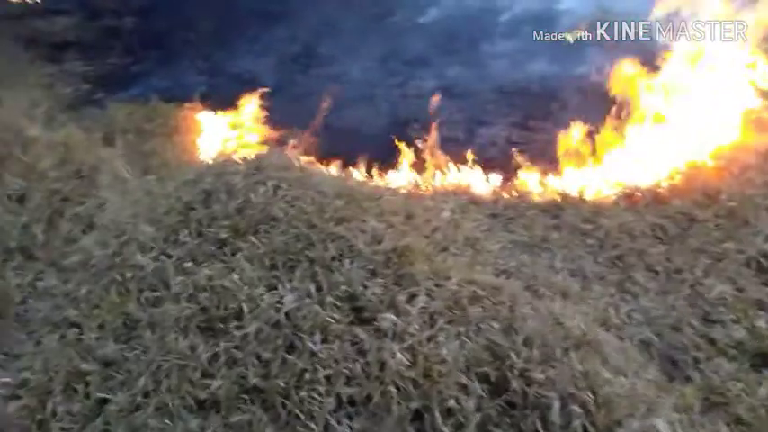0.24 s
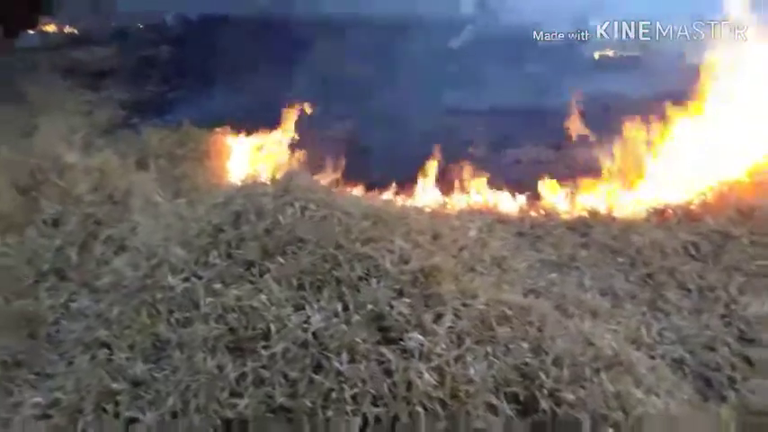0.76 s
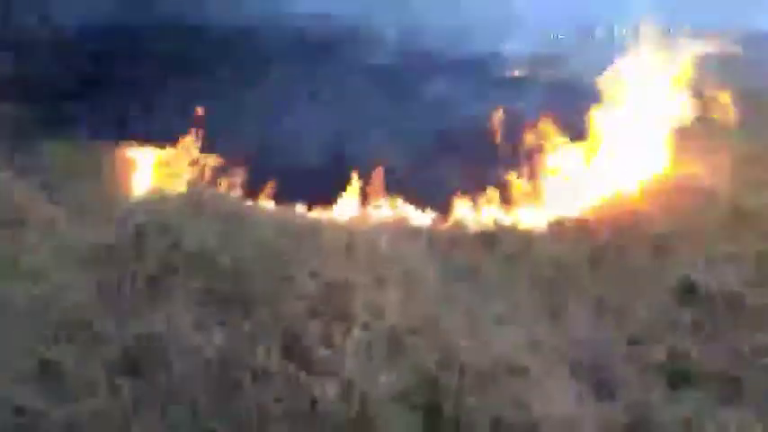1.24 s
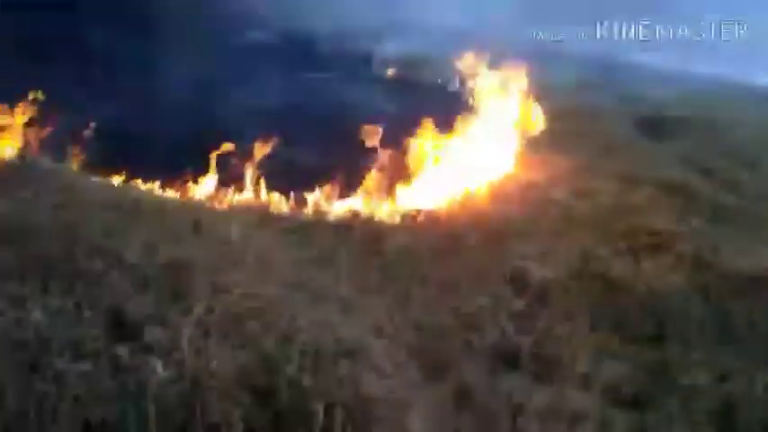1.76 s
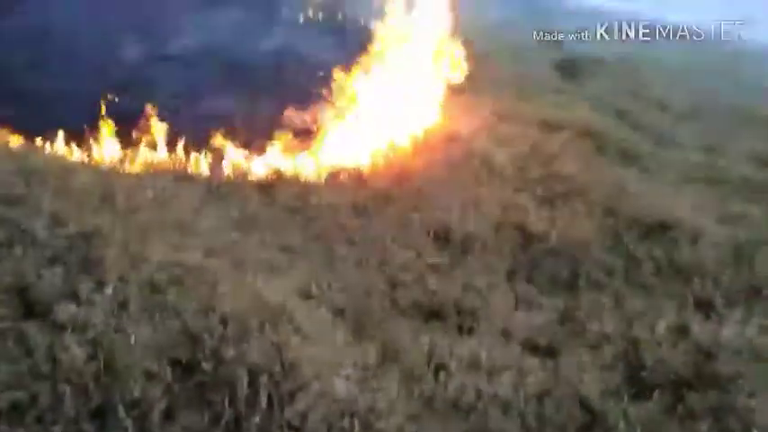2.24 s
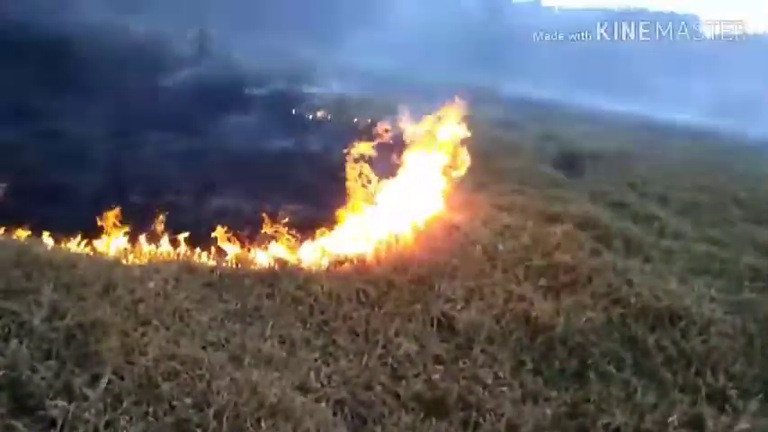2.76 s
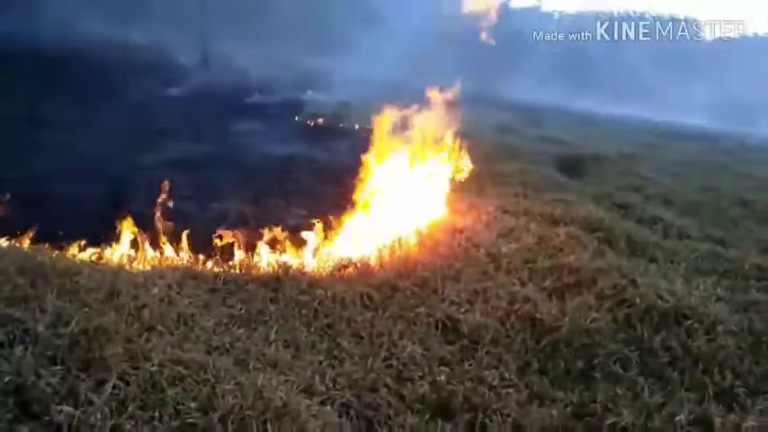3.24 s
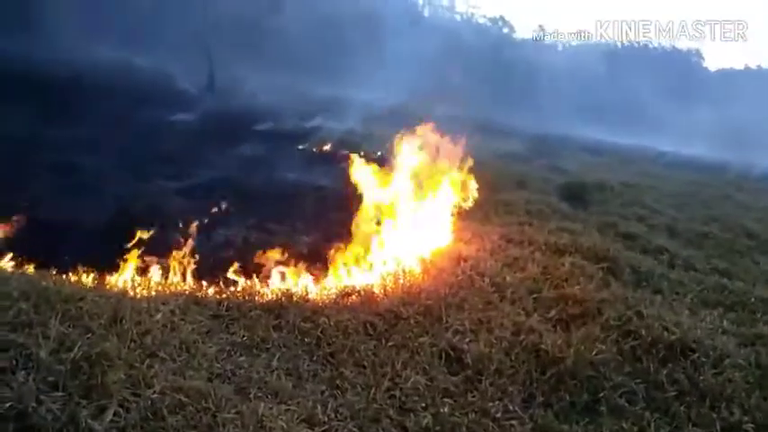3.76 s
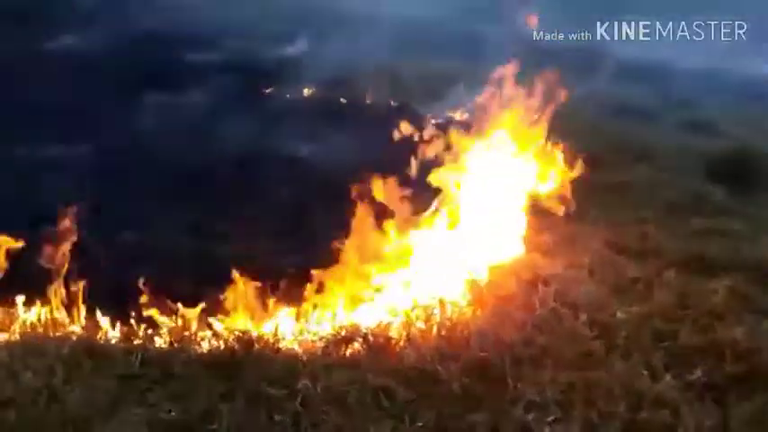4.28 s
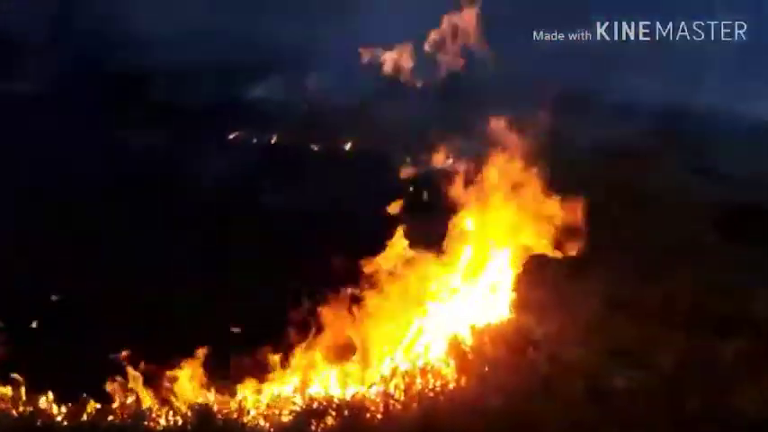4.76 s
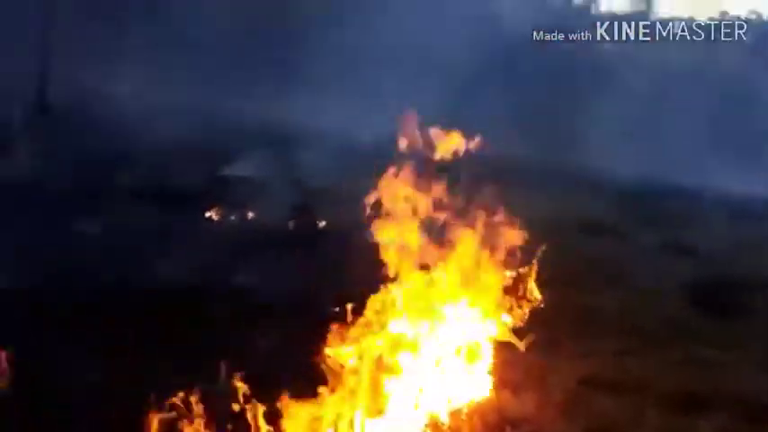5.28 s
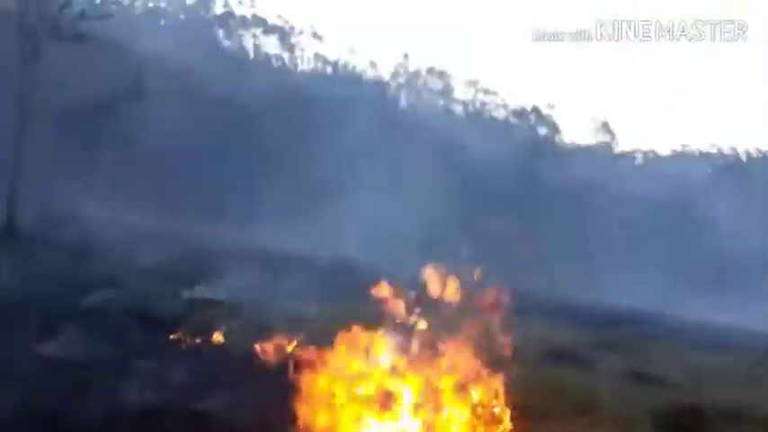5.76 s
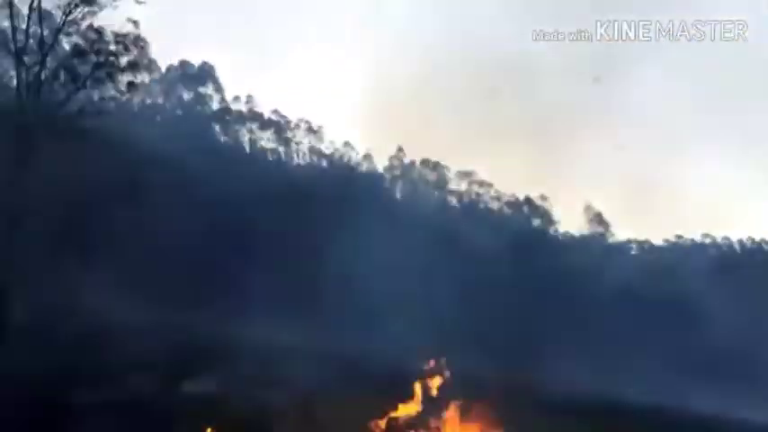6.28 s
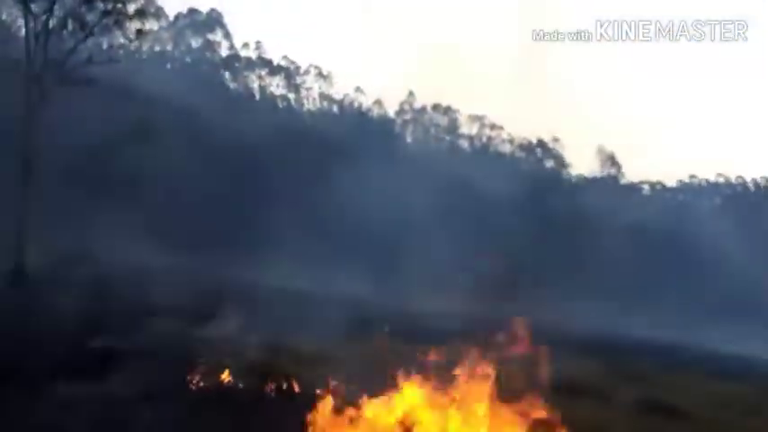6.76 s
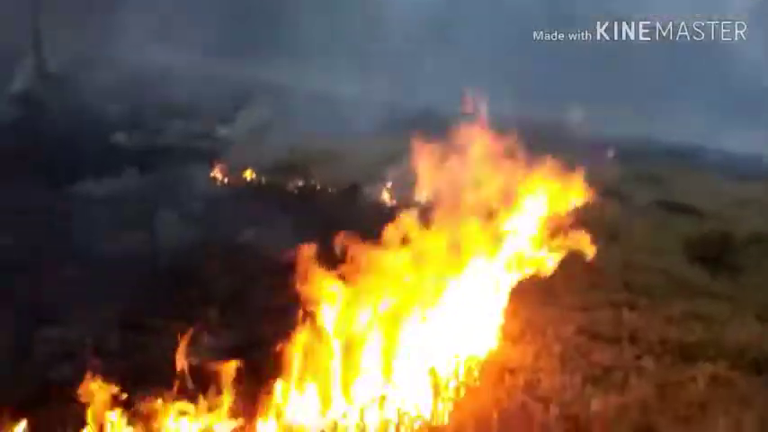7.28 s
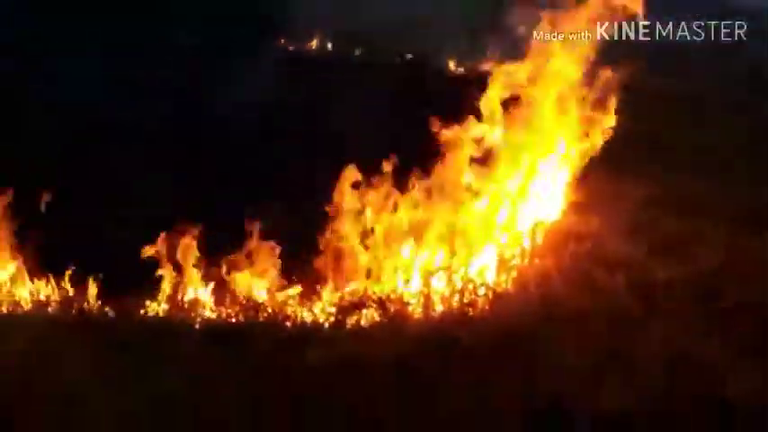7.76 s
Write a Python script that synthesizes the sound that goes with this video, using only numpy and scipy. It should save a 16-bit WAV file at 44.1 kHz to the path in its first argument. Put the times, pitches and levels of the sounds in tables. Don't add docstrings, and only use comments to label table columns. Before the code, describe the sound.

Outdoors on a grassy slope, a front of dry grass burns a few steps from a hand-held phone, wide in stereo, with the left side a little duller. Nearly silent until 0.17 s, then a bright fizzing hiss and flame roar fade in fast, with snaps at once. Dense fine crackle continues throughout. From 1.3 to 2 s the fire surges: heavy cracks, woody knocks, and strong low thumps of air near 1.5 and 1.97 s. It settles from 2 to 2.7 s, though puffs of roar and a hard pop at 2.7 s break through. Fizz strengthens from 3 to 4 s, with short flares and snaps around 3.6 and 4.3 s. The roar turns hollower near 4.8 s; another burst comes at 5.4 s. Around 6 to 7 s it thins to lighter spitting with brief flares. From 7.2 s snaps and fizz build, with buffeting air near 7.7 s, still burning at 8 s.

```python
import sys
import numpy as np
from scipy import signal
from scipy.fft import rfft, irfft, next_fast_len
from scipy.io import wavfile
from scipy.ndimage import uniform_filter1d, map_coordinates

SR = 44100
rng = np.random.default_rng(int(sys.argv[2]) if len(sys.argv) > 2 else 0)


def int16_out(signal):
    q = np.round(np.clip(np.atleast_2d(signal).T, -1, 1) * 32767)
    wavfile.write(sys.argv[1], SR, q.astype(np.int16))


def gain_from_decibels(decibels):
    exponent = np.asarray(decibels, float) / 20
    return 10 ** exponent


N = 353682


def unit(x):
    return x / np.sqrt(np.mean(x ** 2) + 1e-20)


def along(points, hz):
    f, v = np.transpose(points)
    return np.interp(np.log(hz + 1), np.log(f + 1), v)


def wobble(rate):
    knots = rng.standard_normal(int(N * rate / SR) + 4)
    return map_coordinates(knots, [np.arange(N) * rate / SR])


def curves(rows):
    s, *cols = np.transpose(rows)
    return [np.interp(np.arange(N) / SR, s, c) for c in cols]


def swells(rows):
    out = np.zeros(N)
    for s, rise_db, length in rows:
        length = max(length, .02)
        start, end = s - 0.55 * length, s + length
        a, b = int(max(start, 0) * SR), int(end * SR)
        t = np.arange(N)[a:b] / SR
        out[a:b] += np.interp(t, [start, s, end], [0, rise_db, 0])
    return out


def filtered(x, response):
    m = next_fast_len(N + 8192)
    return irfft(rfft(x, m) * response(np.fft.rfftfreq(m, 1 / SR)), m)[..., :N]


def resonance(centre_hz, width_hz):
    return lambda f: 1j * f * width_hz / (centre_hz ** 2 - f * f + 1j * f * width_hz)


def rush(spectrum, patchy_db):
    z = signal.stft(rng.standard_normal((2, N)), nperseg=512)[2]
    field = uniform_filter1d(rng.standard_normal(z.shape[1:]), size=8, axis=0)
    field = uniform_filter1d(field, size=5, axis=1)
    pair = signal.istft(z * gain_from_decibels(patchy_db * unit(field)), nperseg=512)[1][:, :N]
    return unit(filtered(pair, lambda hz: gain_from_decibels(along(spectrum, hz))))


# (f/Hz, width/Hz)
STEM_MODES = [
    (1150, 3540),
    (4000, 6680),
    (9500, 11300),
]


def bursts(s, stems_db, life_ms, spiky_db, ring_db):
    t = np.arange(512) / SR
    life = np.clip(life_ms, .3, 9)[:, None] / 1000
    shape = (1 - np.exp(-t / 0.00037)) * (np.exp(-t / life) + 3.2 * np.exp(-t / 0.00011))
    draw = rng.standard_normal((len(s), 3, len(t)))
    volley = shape * gain_from_decibels(spiky_db * draw[:, 2]) * draw[:, :2].transpose(1, 0, 2)
    volley /= np.sqrt(np.sum(volley ** 2, axis=(0, 2)) / (life[:, 0] * SR))[:, None]
    where = (np.round(s * SR).astype(int)[:, None] + np.arange(len(t))).ravel()

    def lay(db):
        gain = gain_from_decibels(db)[:, None]
        return np.array([np.bincount(where, (gain * v).ravel(), N + len(t))[:N] for v in volley])

    layers = [lay(db) for db in np.transpose(stems_db)]
    out = sum(filtered(x, lambda f: resonance(*mode)(f) ** 2) for x, mode in zip(layers, STEM_MODES))
    return out + gain_from_decibels(ring_db) * filtered(layers[0], resonance(4000, 200))


def air_push(rows, alike_db, opposed_db, cycles=0.35):
    out, t = np.zeros(N + SR), np.arange(SR // 10) / SR
    for s, db, hz in rows:
        swing = np.sin(2 * np.pi * hz * t / (1 + 0.02 * hz * t))
        push = t * hz * np.exp(-t * hz / cycles) * swing
        out[round(s * SR):][:len(t)] += gain_from_decibels(db) * push
    return out[:N] * (gain_from_decibels(alike_db) + gain_from_decibels(opposed_db) * np.array([[1], [-1]]))


# (f/Hz, likeness)
PORT_LIKENESS = [(100, 0.72), (300, 0.7), (450, 0.022), (700, 0.87), (1200, 0.55), (1800, 0.14),
                 (3000, 0.033), (6000, 0.032), (10000, 0.0062)]


def ports(pair, extra):
    turn = lambda hz: np.arccos(np.clip(along(PORT_LIKENESS, hz) + extra, -1, 1)) / 2
    mid, side = filtered(pair, lambda hz: np.array([np.cos(turn(hz)), np.sin(turn(hz))]))
    return np.array([mid + side, mid - side])


# (f/Hz, level/dB per Hz)
FIZZ_COLOUR = [(500, -18), (1000, -29), (1600, -18), (2500, 10), (4000, 3.5), (6500, 5), (9000, 9),
               (12000, 9.5), (15500, -2)]
# (t/s, rise/dB, length/s)
FLARES = [(0.39, 4, 0.11), (0.7, 4, 0.68), (0.92, 1.5, 0.11), (1.1, 7.5, 0.16), (1.3, 6, 0.041),
          (1.4, 6, 0.14), (1.58, 7.5, 0.14), (1.81, 3, 0.085), (3.08, 6, 0.027), (3.475, 6, 0.026),
          (3.68, 12.5, 0.093), (3.815, 7, 0.04), (4.33, 6, 0.13), (4.48, 12, 0.15), (5.005, 8, 0.072),
          (5.31, 8.5, 0.063), (5.43, 9, 0.11), (5.71, 2.5, 0.2), (5.95, 9.5, 0.27), (6.33, 14, 0.043),
          (6.41, 11.5, 0.072), (6.65, 12.5, 0.064), (6.75, 9.5, 0.036), (6.85, 4.5, 0.066),
          (6.95, 4.5, 0.12), (7.15, 4, 0.038), (7.35, 3, 0.14), (7.49, 6.5, 0.018), (7.68, 3, 1)]


def fizz(front_db, flicker_db):
    draw = rng.random((2600, 6))
    size_db = np.minimum(-3.5 * np.log(draw[:, 1:2]), 4) + 9 * (draw[:, 2:5] - .5) + [-5, 0, 0]
    life_ms = .4 + 3 * draw[:, 5] ** 3
    crackle = bursts(draw[:, 0] * (N - 1) / SR, size_db, life_ms, spiky_db=-2.0, ring_db=-40)
    hiss = gain_from_decibels(0.57 + flicker_db) * rush(FIZZ_COLOUR, patchy_db=3.4)
    return gain_from_decibels(front_db + swells(FLARES)) * (hiss + gain_from_decibels(6.0) * crackle)


# (f/Hz, level/dB per Hz)
ROAR_COLOUR = [(200, 2), (380, -3.5), (550, 3.5), (750, 2.5), (1000, -4.5), (1400, -9.5), (2500, -14)]
# (t/s, rise/dB, length/s)
SURGES = [(1.4, 8, 0.024), (1.42, 7, 0.7), (1.465, 13.5, 0.037), (1.5, 10, 0.02), (1.82, 9, 0.14),
          (2.3, 11, 0.53), (2.53, 7.5, 0.15), (2.53, 8, 0.079), (3.457, 14, 0.04), (3.62, 9.5, 0.16),
          (4.32, 11.5, 0.051), (4.42, 13, 0.065), (4.95, 2, 0.04), (5.43, 13.5, 0.074), (5.91, 13, 0.073),
          (6.53, 16.5, 0.023), (6.67, 4, 0.15), (7.18, 12.5, 0.093), (7.69, 15, 0.066)]
# (t/s, level/dB)
CASE_TURN = [
    (0, 2.5),
    (4, -2.5),
    (4.8, -11),
    (8, -5.5),
]


def roar(front_db, flicker_db):
    mean_db = front_db.mean()
    roar_db = mean_db - 1.5 + 0.77 * (front_db - mean_db) + swells(SURGES)
    gusts_db = 1.5 * wobble(70)
    out = gain_from_decibels(roar_db + 2.0 + flicker_db + gusts_db) * rush(ROAR_COLOUR, patchy_db=2.5)
    hollow = filtered(out, lambda hz: resonance(490, 220)(hz) + resonance(1150, 450)(hz))
    return out + (gain_from_decibels(curves(CASE_TURN)[0]) - 1) * hollow


# (f/Hz, level/dB per Hz)
FLUTTER_COLOUR = [(20, -59), (40, -93), (70, -5.5), (120, -4.5), (180, -4), (260, -8), (350, -19),
                  (600, -54)]
# (t/s, rise/dB, length/s)
GUSTS = [(0.84, 5.5, 0.12), (2.18, -3, 0.08), (3.46, 0, 0.067), (3.62, 7, 0.38), (4.14, 3, 0.14),
         (4.32, 13.5, 0.08), (5.02, -3, 0.12), (5.51, -9, 0.15), (5.91, 2, 0.38), (6.41, 12, 0.039),
         (6.53, 8, 0.022), (6.67, 9, 0.031), (6.87, 11, 0.075), (7.19, 6, 0.23), (7.35, 6, 0.14),
         (7.69, 15, 0.22), (7.89, 15.5, 0.31)]


def flutter(air_db):
    lumps = gain_from_decibels(2.5 * np.array([wobble(30), wobble(30)]))
    buffet = unit(lumps * rush(FLUTTER_COLOUR, patchy_db=3.0))
    return gain_from_decibels(air_db + swells(GUSTS) + 4.0) * buffet


# (t/s, front level/dB, moving air level/dB)
BLAZE = [(0.19, -56, -61), (0.4, -46, -47), (0.9, -48, -44), (1.3, -42, -43), (1.55, -44.5, -44),
         (1.75, -49.5, -46), (2.05, -50.5, -53.5), (2.45, -51.5, -42.5), (2.7, -50.5, -54.5),
         (3.1, -45.5, -49.5), (3.9, -46, -54), (4.7, -50.5, -54), (5.1, -45, -50), (5.6, -49.5, -49.5),
         (6.3, -54.5, -55), (7.08, -51.5, -51), (7.25, -49, -49.5), (8.02, -45.5, -65)]


def flames():
    front_db, air_db = curves(BLAZE)
    flicker_db = 1.7 * wobble(40)
    return fizz(front_db, flicker_db) + roar(front_db, flicker_db) + flutter(air_db)


# (t/s, level/dB, thick stems/dB, fine stems/dB)
POPS = [(0.2598, -30.5, -17, -5), (0.38, -43.5, 19, 2), (0.6142, -33, 5.5, 11.5), (1.3524, -36, 21.5, 22),
        (1.4433, -16.5, -9, -28), (1.5869, -23.5, 12.5, -20), (1.6819, -20.5, 1, -20),
        (1.7503, -40.5, 22, -8), (1.7763, -33, 21.5, -11), (1.796, -35.5, 19.5, -1), (2.3735, -43, 19, 8),
        (2.6202, -50.5, 26, 1), (2.7322, -19.5, -3.5, -21), (3.8038, -28.5, 2, -18),
        (3.8126, -32, 10, 12.5), (3.9208, -39.5, 16.5, 3), (4.586, -23, -7, 6.5), (5.4138, -42, 22.5, 15),
        (5.4327, -34, 7, -6), (5.4674, -41.5, -14, 25), (5.8963, -29, -23, 3.5), (5.9082, -34, -21, -1),
        (6.3984, -46, -5, 14), (6.4247, -40.5, 10, 22), (6.594, -31.5, -22, 7), (6.817, -36, -26, 5),
        (7.2993, -33, 17.5, -9), (7.421, -34.5, -1, 10.5), (7.4803, -29.5, 7, -13), (7.5557, -29, 3.5, -14),
        ]
SNAPS = [(0.3518, -30.5, -20, -1), (0.3728, -42, 15, 12.5), (1.0373, -29, 3, 2), (1.5284, -27, 5, -14),
         (1.5371, -23, -17, -2), (1.9081, -55, 29, 30), (2.1605, -28.5, 7, -30), (2.5312, -30, 3, 7),
         (2.8092, -35, 18.5, 3), (3.0158, -31.5, 1, 2.5), (3.1395, -29, -20, -21),
         (3.3834, -53.5, 24.5, 29.5), (3.4549, -39, 11.5, -7), (3.792, -36.5, -25, 13),
         (4.0494, -22.5, -18, -34), (4.0655, -32.5, -14, 5), (4.3346, -24, -4, 2), (4.8984, -31, -16, -7),
         (5.4438, -30.5, 14, 11), (5.9639, -27.5, -6, 2.5), (5.9992, -34.5, 1, 13.5),
         (6.5773, -36.5, -24, 2.5), (6.742, -52.5, 15.5, 26.5), (6.8325, -34.5, -27, 4.5),
         (6.859, -33, -7, -3), (6.94, -37, 1, 9.5), (7.3062, -33, 8, -12), (7.4452, -28, -29, 2),
         (7.8653, -24, -6, -10), (7.9038, -21.5, -0.5, -4.5)]
CRACKS = [(0.6569, -28, 0, 3.5), (0.7073, -44, -15, 11), (1.2986, -41.5, 17.5, 16.5), (1.3857, -30, 17, -9),
          (1.3951, -36.5, 18, -5), (1.8114, -47, 23, 21), (1.8346, -14, -3.5, -36),
          (2.8722, -25.5, 3.5, -1), (2.9822, -34, 0.5, -4), (3.2782, -46.5, 16.5, -2),
          (3.7413, -21.5, -30, -13), (4.1543, -24.5, 1, -25), (4.2922, -42, -21, 12.5),
          (4.4123, -25, -12, -3), (4.7718, -33, -3, -1.5), (4.8897, -30, -11, -13),
          (5.1905, -44.5, -24, 13.5), (5.5985, -36.5, -17, 3.5), (5.6482, -31, -22, -25),
          (6.3122, -40, -25, 12.5), (6.3273, -34, -23, 3), (6.334, -46.5, 17.5, -10),
          (6.4141, -31, -0.5, -10), (6.5217, -32.5, -1, 3.5), (7.1776, -28.5, -9, -2),
          (7.3528, -29, 16, -11), (7.6706, -29.5, 5, 4), (7.7819, -28.5, 4, -25)]
TEARS = [(0.1824, -39.5, -3, -5), (0.699, -24.5, -12, -28), (0.7955, -38, -24, 5),
         (0.9252, -52.5, 11, 24.5), (0.9327, -53, -15, 21.5), (1.055, -41, -19, 8), (1.431, -27, -29, 2),
         (1.4962, -40, 16.5, 16), (2.6787, -33, 0, -22), (3.249, -33.5, -8, -18), (3.4763, -30.5, -23, 3),
         (3.5681, -32, -1.5, -22), (3.5728, -35.5, -4, 8.5), (3.5944, -28.5, -1.5, -5),
         (3.736, -32.5, -26, 5.5), (4.2981, -29, -2.5, 2), (4.3071, -29, -28, -1), (4.3441, -30, -33, 2),
         (4.5287, -31, -15, -5), (4.8582, -41, -28, 12), (5.439, -28.5, -6, -1), (7.1435, -36, -28, 4),
         (7.3349, -23, -13, -1), (7.97, -33, -29, 5.5)]


def snaps():
    kinds = [(POPS, 1.58), (SNAPS, 3.48), (CRACKS, 4), (TEARS, 7)]
    events = [(*row, ms) for rows, ms in kinds for row in rows]
    s, db, thick_db, fine_db, life_ms = np.transpose(events)
    sizes_db = np.transpose([db + thick_db, db, db + fine_db]) + 7.0
    return bursts(s - .0003, sizes_db, 0.65 * life_ms, spiky_db=3, ring_db=-7)


# (t/s, level/dB, f/Hz)
KNOCKS = [(0.1984, -32, 1060), (0.2342, -34, 556), (0.3803, -43, 850), (0.41, -25.5, 680),
          (0.59, -26.5, 596), (0.8185, -27.5, 617), (0.8736, -23, 500), (1.0376, -23.5, 630),
          (1.1941, -27.5, 597), (1.2992, -14.5, 880), (1.3862, -39, 1110), (1.4565, -15, 590),
          (1.4784, -22, 577), (1.4972, -15.5, 517), (1.7763, -24, 1030), (1.8915, -23, 1010),
          (2.0997, -42, 731), (2.2564, -27, 720), (2.3, -22, 960), (2.3203, -24, 765), (2.3732, -18, 446),
          (2.5175, -17.5, 555), (2.7532, -27, 1330), (2.8095, -36, 1200), (2.9623, -24.5, 725),
          (3.2705, -24, 665), (3.4545, -20, 780), (3.5945, -23, 830), (3.665, -20.5, 590),
          (3.8436, -22.5, 1080), (3.8878, -23, 790), (4.0663, -25, 1400), (4.3067, -24.5, 690),
          (4.4021, -31, 750), (4.7144, -36, 740), (4.8979, -31, 710), (4.96, -24.5, 624),
          (5.0994, -26.5, 684), (5.1074, -27.5, 695), (5.309, -21, 770), (5.6866, -28, 740),
          (5.7032, -34, 800), (6.6689, -27, 770), (6.6764, -30, 796), (6.7602, -37, 780),
          (6.8612, -33, 594), (6.8971, -40.5, 590), (6.9618, -35, 510), (7.1782, -20, 696),
          (7.2621, -26, 783), (7.3416, -28, 970), (7.6117, -28, 695), (7.6497, -22.5, 740),
          (7.7254, -24.5, 710), (7.733, -28, 770), (7.7827, -18, 1080), (7.8642, -21, 750)]


def knocks():
    return air_push(KNOCKS, 5.5, -7.0, cycles=0.62)


# (t/s, level/dB, fine over middle
# stems/dB)
TICKS = [(0.2105, -29, -2), (0.2784, -28, 3), (0.3801, -23.5, 1), (0.4265, -24, 3), (0.4525, -25.5, 11),
         (0.5208, -31, 12), (0.5453, -32, 11), (0.5897, -30, 8), (0.6994, -15, 0), (0.8411, -30.5, 17),
         (0.9873, -34, 20), (1.088, -24, 7), (1.1948, -26, 10), (1.2531, -26, 15), (1.3155, -23, -11),
         (1.3858, -20, -13), (1.4731, -21, -2), (1.6552, -20, -6.5), (1.6812, -16.5, 2), (1.8044, -21, -1),
         (2.0813, -29, -0.5), (2.1002, -27, 1.5), (2.2205, -26.5, -1), (2.4429, -28, -4),
         (2.5008, -27, -16), (2.5467, -42, 6), (2.7004, -26.5, -9), (2.7617, -23.5, 3), (3.0561, -26, 1),
         (3.1314, -35, 7), (3.6048, -21, -4), (3.6507, -22, -11), (3.8123, -20.5, -10), (3.9395, -26, -5),
         (4.2289, -24.5, 0), (4.3202, -26, -1), (4.3346, -22, 4), (4.5761, -24, 9), (4.8131, -27.5, -7),
         (4.8699, -23, 2), (4.9468, -35, 7), (4.9986, -23.5, -6), (5.1179, -26.5, 11), (5.4317, -20.5, -2),
         (5.5629, -32, 3), (5.704, -28.5, -7), (5.924, -22, 4), (5.9365, -22, 11), (6.2059, -30.5, -4),
         (6.2184, -34, 6), (6.4643, -35, 10), (6.5875, -33, -2), (7.1053, -38.5, 21), (7.2989, -19.5, -11),
         (7.48, -22, -6), (7.6122, -30, -6.5), (7.8222, -31.5, -9), (7.8397, -27, 3), (7.927, -27, 16),
         (7.9624, -27, 6),
         (2.447, -28, -2),
    (3.674, -21, -13),
    (3.843, -23, -3),
    (3.993, -37, -15),
    (4.021, -47, -4),
    (6.039, -28, -11),
    (6.083, -26, -6),
    (7.33, -22, -11),
    (7.3358, -14.5, -10),
]


def ticks():
    s, db, fine_db = np.transpose(TICKS)
    sizes_db = np.transpose([db - fine_db - 10.5, db - fine_db / 2, db + fine_db / 2]) - 2.5
    return bursts(s, sizes_db, np.full(len(s), 2.9), spiky_db=-2.0, ring_db=-30)


# (t/s, level/dB, f/Hz)
POCKETS = [(0.236, -36, 198), (0.411, -30, 194), (0.539, -38, 175), (0.591, -36, 191), (0.689, -35, 142),
           (1.146, -26.5, 204), (1.277, -35, 185), (1.399, -24, 144), (1.958, -28.5, 192), (2.68, -37, 184),
           (2.874, -31, 217.5), (3.02, -32, 182), (3.059, -35, 176), (3.382, -34.5, 211), (3.6, -28.5, 183),
           (3.714, -34, 184), (4.114, -33, 178), (4.157, -33, 178), (4.435, -31, 170), (5.057, -37, 190),
           (5.357, -31, 203), (5.79, -52, 185), (6.044, -39, 156), (6.339, -40, 150), (6.759, -35.5, 210),
           (7.112, -37.5, 233), (7.87, -31, 192)]


def pockets():
    return air_push(POCKETS, 19.8, 1.4, cycles=0.39)


# (t/s, level/dB, f/Hz)
PUFFS = [
    (0.821, -28.5, 155),
    (0.873, -36, 172),
    (1.305, -34, 388),
    (1.499, -23, 114),
    (4.957, -30.5, 255),
    (5.018, -32, 201),
    (7.688, -34, 105),
]


def puffs():
    return air_push(PUFFS, 23.2, 6.8)


# (t/s, level/dB, f/Hz)
THUMPS = [(1.455, -12, 140), (1.468, -10, 135), (1.482, -20, 140), (1.499, 2, 149), (1.559, -15, 119),
          (1.674, -19, 126), (1.775, -18, 123), (1.887, -18, 141), (1.967, 0, 158), (2.151, -12, 130),
          (2.317, -16, 160), (2.377, -16, 187), (2.491, -11, 130), (2.637, -19, 125), (3.654, -11, 105),
          (6.963, -29, 129), (7.691, -8, 106)]


def thumps():
    return air_push(THUMPS, -0.33, 13.2)


# (f/Hz, level/dB)
LEFT_SHADE = [(300, -1.5), (2000, 0.5), (6000, -0.5), (8500, -3.5), (11000, -8.5), (13000, -12.5),
              (15000, -12)]


def scene():
    fire = ports(flames(), extra=0)
    stems = ports(snaps(), extra=0.16) + ports(ticks(), extra=0.076)
    left, right = fire + stems + knocks() + pockets() + puffs() + thumps()
    return np.array([filtered(left, lambda hz: gain_from_decibels(along(LEFT_SHADE, hz))), right])


# (f/Hz, share)
CROSS_SHARE = [(100, 0.29), (1200, 0.096), (2500, 0.49), (5000, 0.32), (7500, 0.37), (9500, 0.26),
               (12000, 0.071), (15000, .05)]
# (f/Hz, level/dB)
TOP_EDGE = [(12000, 0), (15500, -2), (15750, -24), (16500, -37), (16800, -60)]


def widen(dry):
    delay_s, low_hz = .000409, 50
    late = filtered(dry[::-1], lambda hz: along(CROSS_SHARE, hz) * np.exp(-2j * np.pi * hz * delay_s))
    bass_cut = lambda hz: (1j * hz / (low_hz + 1j * hz)) ** 4
    return filtered(dry - late, lambda hz: bass_cut(hz) * gain_from_decibels(along(TOP_EDGE, hz)))


def thin_stereo(pair, under_db, faint_db, scatter_db):
    z = signal.stft([pair[0] + pair[1], pair[0] - pair[1]], nperseg=1024)[2]
    bands = np.abs(z[:, :512]).reshape(2, 128, 4, -1) ** 2
    power = uniform_filter1d(bands.sum(axis=2), size=5, axis=2)
    power = uniform_filter1d(power, size=2, axis=1)
    level_db = 10 * np.log10(np.abs(power) + 1e-20)
    frames = level_db.shape[2]
    drift = uniform_filter1d(rng.standard_normal((2, 16, frames)), size=4, axis=2)
    bar_db = under_db + scatter_db * unit(drift).repeat(8, axis=1)
    bar_db = bar_db + np.interp(np.arange(128), [10, 12, 32, 46, 52], [5, 0, 0, 3.5, 6])[:, None]
    kept = level_db > level_db[::-1] - bar_db
    kept &= level_db > faint_db + scatter_db * rng.standard_normal(level_db.shape)
    ragged_top = 89.5 + uniform_filter1d(rng.normal(0, 2.5, frames), size=3)
    kept &= np.arange(128)[:, None] < ragged_top
    kept = kept[:, :, ::2].repeat(2, axis=2)[:, :, :frames]
    loud_db = 10 * np.log10(bands[:, 6:].sum(axis=(0, 1, 2)) + 1e-20)
    kept[:, :, loud_db > uniform_filter1d(loud_db, size=9) + 4.5] = True
    kept[:, :6] = True
    z[:, :512] *= np.repeat(kept, 4, axis=1)
    mid, side = signal.istft(z, nperseg=1024)[1][:, :N] / 2
    return np.array([mid + side, mid - side])


def band_limit(x):
    return signal.sosfilt(signal.butter(12, 16630, fs=SR, output="sos"), x)


def record(dry):
    wide = widen(dry)
    held = wide / (1 + (wide / .6) ** 6) ** (1 / 6)
    thinned = thin_stereo(held, under_db=2.5, faint_db=-80, scatter_db=1.5)
    start_s, fade_s = .165, 0.029
    fade = np.clip((np.arange(N) / SR - start_s) / fade_s, 0, 1)
    return band_limit(thinned * fade)


dry = scene()
out = record(dry)
int16_out(out)
```